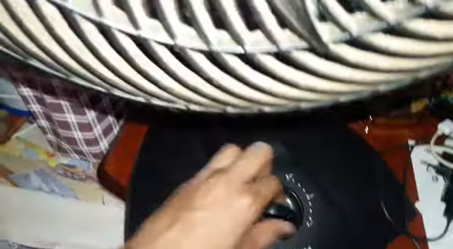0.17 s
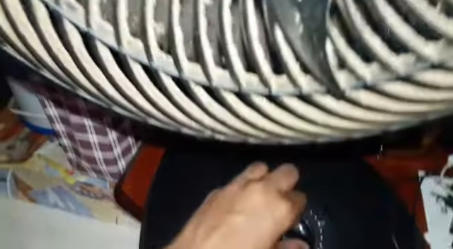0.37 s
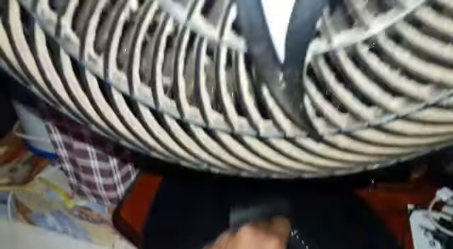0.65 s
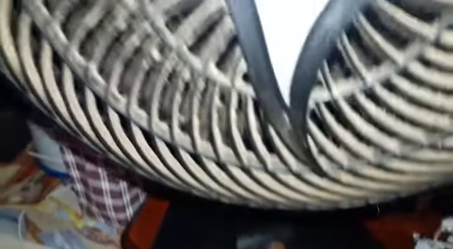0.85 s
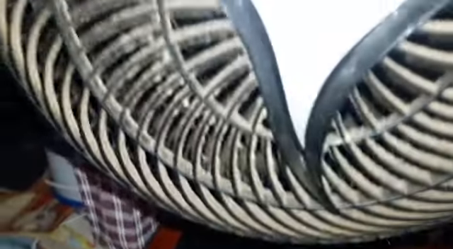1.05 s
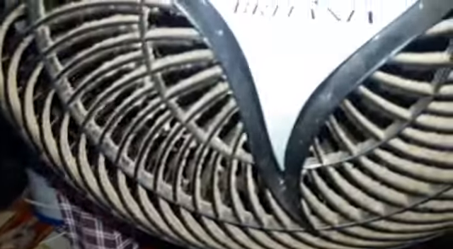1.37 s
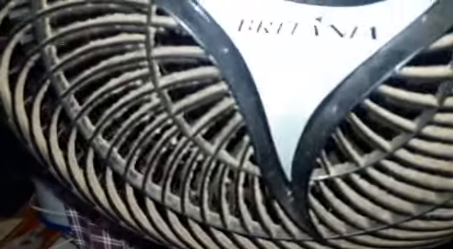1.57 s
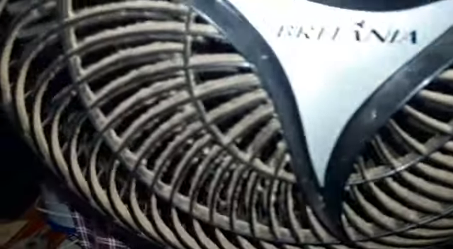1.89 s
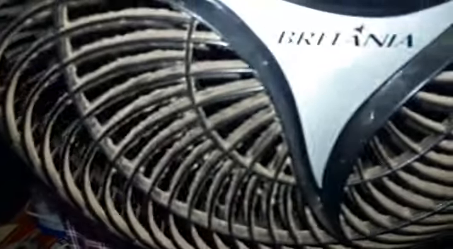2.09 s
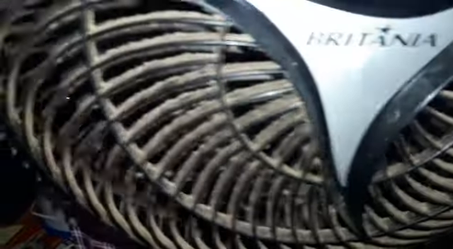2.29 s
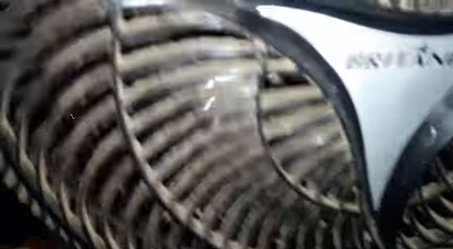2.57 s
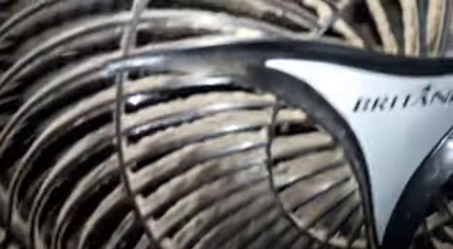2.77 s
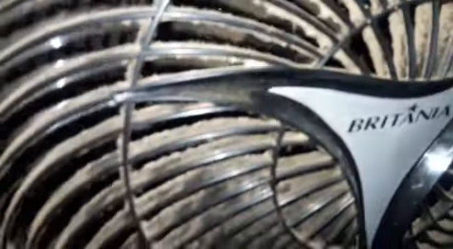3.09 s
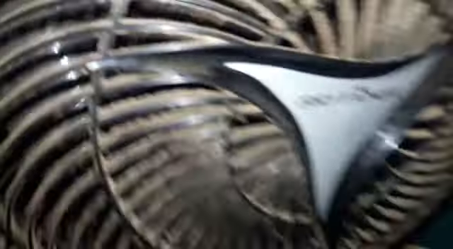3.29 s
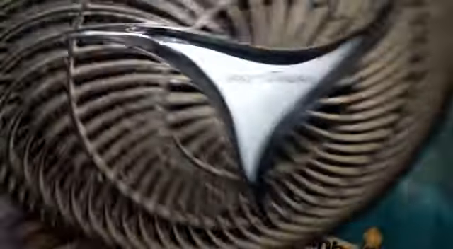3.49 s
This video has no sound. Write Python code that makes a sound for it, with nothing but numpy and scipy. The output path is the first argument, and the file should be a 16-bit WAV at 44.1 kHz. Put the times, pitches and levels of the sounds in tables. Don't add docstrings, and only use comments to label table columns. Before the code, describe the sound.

A desk fan blows directly onto a hand-held phone indoors, making a continuous, rough low buffeting, strongest around two to three seconds, with soft blade hiss growing nearer and a few faint plastic ticks.

```python
import sys
import numpy as np
from scipy import signal
from scipy.fft import rfft, irfft
from scipy.io import wavfile
from scipy.ndimage import uniform_filter1d, map_coordinates

SR = 44100
rng = np.random.default_rng(int(sys.argv[2]) if len(sys.argv) > 2 else 0)


def boost(x):
    u = np.asarray(x, float) / 20
    return 10 ** u


def transcribe(u):
    v = np.clip(np.atleast_2d(u).T, -1, 1)
    q = np.round(v * 32767).astype(np.int16)
    wavfile.write(sys.argv[1], SR, q)


N = 160965

# time_s, buffet_level_db, air_speed_octaves
AIR_STREAM = [(0, -17.5, 0.093), (.3, -16.5, .1), (.5, -15.5, -0.042), (.7, -14, 0.053),
              (1.0, -14.5, 0.00075), (1.35, -14.5, 0.014), (1.65, -15, 0.06), (1.95, -10.5, .2),
              (2.25, -13.5, .15), (2.6, -14, .1), (2.95, -11, 0.098), (3.3, -15, .15),
              (3.45, -15.5, -0.011), (3.65, -16.5, -0.024)]


def amp_curve(table, x, col):
    table = np.array(table, float)
    return np.interp(x, table[:, 0], table[:, col])


def colour_db(table, hz):
    table = np.array(table, float)
    return np.interp(np.log(np.maximum(hz, 1)), np.log(table[:, 0]), table[:, 1])


def unit(x):
    return x / np.sqrt(np.mean(x ** 2))


def band(x, hz, width_hz):
    return signal.lfilter(*signal.iirpeak(min(hz, .45 * SR), hz / width_hz, fs=SR), x)


def walk(rate_hz):
    hold = int(SR / rate_hz)
    held = np.repeat(rng.standard_normal(200), hold)[:N]
    held = np.pad(held, (0, N - len(held)), mode="wrap")
    return unit(uniform_filter1d(uniform_filter1d(held, hold), hold))


def eddy(lag, db, hz, cycles, turn):
    outline = np.exp(-(lag * hz / cycles) ** 2)
    return boost(db) * outline * np.sin(2 * np.pi * (hz * lag + turn)), outline


def ticks(t):
    # start_s, peak_db, low_share_db, ring_s, body_pitch_hz
    tick_events = [
        (0.309, -44.5, 10, 0.0048, 1300),
        (0.6493, -32, 2.5, 0.0053, 1490),
        (2.018, -41, 1, 0.0036, 2300),
        (2.03, -49.5, 12, 0.0075, 1600),
        (3.1833, -39.5, 11.5, 0.0056, 2030),
        (3.198, -49, 17, 0.0071, 1972),
    ]
    # multiple_of_body_pitch, width_hz, level_db
    housing_modes = [(.7, 494, 5), (1.01, 565, 5), (1.35, 400, -0.5), (1.9, 1400, -14)]
    port_ring_hz, port_ring_s, port_ring_db = 7500, .002, 2
    onset_s, crack_s, tail_s = .00022, .003, .018
    out = np.zeros(N)
    for at, db, low_db, ring_s, body_hz in tick_events:
        lag = np.maximum(t - at, 0)
        noise = np.sign(rng.standard_normal(N)) * (1 - np.exp(-lag / onset_s))
        snap = noise * (np.exp(-lag / crack_s) + 0.26 * np.exp(-lag / tail_s))
        crack = band(band(snap, 7600, 6500), 7600, 6500)
        swell = lag / port_ring_s * np.exp(1 - lag / port_ring_s * 2)
        crack += boost(port_ring_db) * swell * np.sin(2 * np.pi * port_ring_hz * lag)
        rattle = noise * np.exp(-lag / ring_s)
        body = 0
        for multiple, width_hz, mode_db in housing_modes:
            mode_hz = multiple * body_hz
            body = body + boost(mode_db) * band(band(rattle, mode_hz, width_hz), mode_hz, width_hz)
        out += boost(db) * (crack + boost(low_db + 15) * body)
    return out


def port(x):
    # centre_hz, half_width_hz, lift_or_dip_db
    port_bands = [(1235, 34, -5.5), (1340, 190, 2.5), (7380, 1240, 11), (7980, 220, -4), (8980, 450, 4.5)]
    hz = np.arange(N // 2 + 1) * SR / N
    lift_db = sum(db * np.exp(-((hz - at_hz) / width) ** 2) for at_hz, width, db in port_bands)
    return irfft(rfft(x) * boost(lift_db), N)


def hiss(t):
    # time_s, hiss_level_db
    closeness = [(0, -42), (.56, -41.5), (.95, -41.5), (1.24, -40), (1.51, -38), (1.97, -39), (2.24, -37),
                 (2.49, -35.5), (3.07, -33.5), (3.25, -36), (3.48, -39.5), (3.65, -43)]
    # frequency_hz, level_db (per Hz)
    hiss_colour = [(700, 2.5), (1700, -4.5), (2300, -7.5), (3000, -15.5), (4000, -24), (5200, -28),
                   (11800, -33.5), (14000, -42)]
    treble_db_per_db, reference_db = 0.28, -37
    near_db = amp_curve(closeness, t, col=1)
    surge, throb = walk(4.68), walk(18)
    hz = np.maximum(np.arange(N // 2 + 1) * SR / N, 1)
    rush = rfft(rng.standard_normal(N)) * boost(colour_db(hiss_colour, hz))
    out = 0
    for mid_hz in 300 * 2 ** np.arange(0, 6.5, .5):
        share = np.maximum(1 - 2 * np.abs(np.log2(hz / mid_hz)), 0)
        tilt_db = treble_db_per_db * max(np.log2(mid_hz / 1500), 0) * (near_db - reference_db)
        flicker_db = .5 * surge + 0.47 * throb + 0.76 * walk(15)
        out = out + irfft(rush * share, N) * boost(tilt_db + flicker_db)
    return unit(port(out)) * boost(near_db + 3.5)


def slaps():
    # pitch_hz, rate_per_s, level_db
    slap_kinds = [
        (160, 20, -22.5),
        (320, 40, -22.5),
        (476, 25, -43),
    ]
    spread_db, top_db = 6.5, 1.5
    out = 0
    for hz, rate, db in slap_kinds:
        chance = rng.random(N)
        size_db = np.minimum(spread_db * rng.exponential(size=N), top_db)
        size = boost(size_db) * rng.choice([-1, 1], size=N)
        u = np.pi * hz * np.arange(-600, 601) / SR
        pulse = (1 - 2 * u ** 2) * np.exp(-u ** 2)
        out = out + boost(db) * signal.fftconvolve((chance < rate / SR) * size, pulse, "same")
    return out


def puffs(t):
    # peak_time_s, peak_db, eddy_pitch_hz
    puff_events = [(0.007, -9.5, 514), (0.076, -14, 507), (0.135, -19, 540), (0.226, -20, 540),
                   (0.265, -13, 530), (0.286, -17, 540), (0.356, -28, 550), (0.556, -15.5, 490),
                   (0.624, -6, 540), (0.66, -12, 490), (0.746, -21, 510), (0.871, -29, 560),
                   (0.962, -13, 530), (1.063, -10.5, 510), (1.13, -10.5, 527), (1.185, -13, 525),
                   (1.252, -14, 526), (1.433, -34, 530), (1.462, -13, 520), (1.509, -18, 570),
                   (1.528, -15, 530), (1.552, -11, 600), (1.633, -19, 570), (1.682, -11, 507.2),
                   (1.719, -8.5, 537), (1.855, -9, 596.3), (1.892, -6, 610), (1.92, -10, 630),
                   (1.965, -6, 540), (2.013, -5.5, 590), (2.061, -5, 513), (2.131, -4, 510),
                   (2.16, -6.5, 553), (2.221, -2, 473), (2.333, -6.5, 530), (2.446, -8, 524),
                   (2.468, -12, 587.7), (2.524, -17, 525), (2.567, -8.5, 550), (2.663, -9.5, 541.5),
                   (2.751, -10, 510), (2.777, -8.5, 509.4), (2.817, -8, 528.8), (2.854, -12.5, 620),
                   (2.93, -9, 490), (2.977, -10, 544), (3.06, -13, 530), (3.176, -14, 512.6),
                   (3.205, -11.5, 513), (3.283, -10.5, 520), (3.32, -10, 560), (3.351, -12, 530),
                   (3.546, -11.5, 510), (3.565, -27, 510), (3.618, -14.5, 550), (3.637, -21, 554)]
    rise_s, fall_s, lift_octaves = .006, .010, .1
    speed, shed = np.zeros(N), np.zeros(N)
    for (at, db, hz), turn in zip(puff_events, rng.random(60)):
        lag = t - at
        speed += lift_octaves * np.exp(-np.where(lag < 0, (lag / rise_s) ** 2, lag / fall_s))
        shed += eddy(lag, db - 5.5, hz, 1.08, turn)[0]
    return speed, shed


def swings(t):
    # centre_time_s, peak_db, pitch_hz
    swing_events = [(0.01, -4.5, 196), (0.074, -5.5, 212), (0.227, -4.5, 167), (0.278, -7.5, 179),
                    (0.395, -4.5, 194), (0.487, -3, 157), (0.535, -2, 236), (0.622, -3.5, 219.5),
                    (0.661, -3.5, 211), (0.754, -7.5, 164), (0.8, -4.5, 194), (0.87, -8, 218),
                    (0.908, -2, 198), (0.942, -3, 180), (0.976, -4, 220), (1.048, -5.5, 183),
                    (1.147, -2.5, 158), (1.199, -2, 240), (1.22, -2, 170), (1.259, -2, 200.4),
                    (1.332, -4.5, 213), (1.412, -1, 180), (1.437, -2.5, 207.5), (1.551, -2.5, 210),
                    (1.594, -3.5, 252.4), (1.653, -5.5, 192), (1.745, -4, 201), (1.773, -2, 275),
                    (1.911, -2.5, 246), (1.969, 1.5, 230), (2.001, -1, 169.4), (2.148, -1, 217),
                    (2.198, -8.5, 188.9), (2.332, -2, 335), (2.395, -6, 202), (2.442, -5, 230.6),
                    (2.491, -3.5, 241), (2.545, -5.5, 160), (2.58, -4.5, 210), (2.658, -3, 235),
                    (2.708, -1, 188), (2.777, -2.5, 292), (2.819, -2, 213.3), (2.857, -0.5, 262),
                    (2.9, -3, 213), (2.931, -6, 240), (2.989, -4.5, 213), (3.041, -0.5, 292),
                    (3.101, -7, 208.7), (3.143, -1, 197), (3.178, -3.5, 195), (3.206, -6, 233),
                    (3.235, -3, 180), (3.283, -4, 240), (3.311, -5.5, 223.6), (3.358, -4, 218),
                    (3.439, -1.5, 226), (3.512, -1.5, 237.1), (3.553, -2.5, 218.1), (3.622, -5, 178)]
    share_taken = 0.51
    out, room_left = np.zeros(N), np.ones(N)
    for (at, db, hz), turn in zip(swing_events, rng.random(60)):
        near = slice(max(int((at - .03) * SR), 0), int((at + .03) * SR))
        swing, outline = eddy(t[near] - at, db - 2, hz, 0.69, turn)
        out[near] += swing
        room_left[near] *= 1 - share_taken * outline
    return out, room_left


def buffet(t, speed):
    # frequency_hz, level_db (per Hz)
    eddy_colour = [(30, -2.5), (90, 1.5), (180, -1), (280, -3.5), (400, -9), (550, -22.5), (750, -37.5),
                   (1100, -85.5)]
    swirl_octaves, flutter_octaves = .03, .11
    db_per_octave, patchy_db, mic_low_hz = 3.5, 1.5, 92
    size = 3 * N
    hz = np.arange(size // 2 + 1) * SR / size
    eddies = unit(irfft(rfft(rng.standard_normal(size)) * boost(colour_db(eddy_colour, hz)), size))
    gust = swirl_octaves * walk(20) + flutter_octaves * walk(45) + speed
    place = np.cumsum(2 ** (gust + amp_curve(AIR_STREAM, t, col=2)))
    wind = map_coordinates(eddies, [place], order=3, mode="wrap")
    wind = wind * boost(db_per_octave * gust + patchy_db * walk(40))
    wind = signal.sosfilt(signal.butter(3, mic_low_hz, "high", fs=SR, output="sos"), wind)
    return unit(wind) * boost(amp_curve(AIR_STREAM, t, col=1) - 1.5)


def scene():
    t = np.arange(N) / SR
    speed, shed = puffs(t)
    wind = buffet(t, speed)
    wind = wind + slaps() * boost(amp_curve(AIR_STREAM, t, col=1) + 16)
    big, room_left = swings(t)
    return (wind * room_left + big + shed + hiss(t) + ticks(t))[None]


def low_pass(x):
    return signal.sosfilt(signal.butter(12, 14450, fs=SR, output="sos"), x)


def record(dry):
    drive = 0.47
    mix = np.tanh(drive * dry) / drive
    return low_pass(mix)


dry = scene()
out = record(dry)
transcribe(out)
```